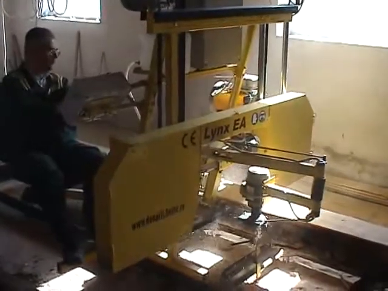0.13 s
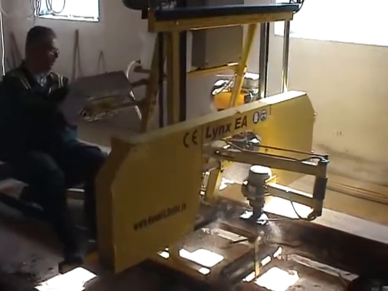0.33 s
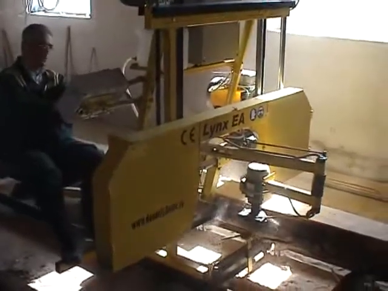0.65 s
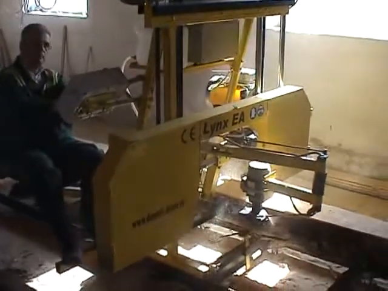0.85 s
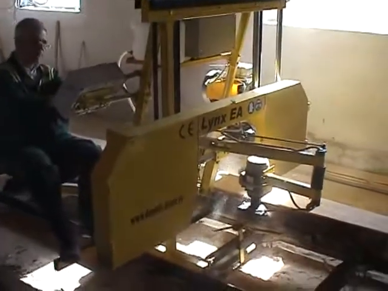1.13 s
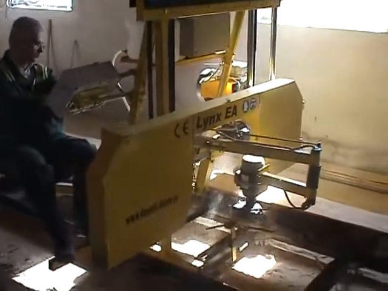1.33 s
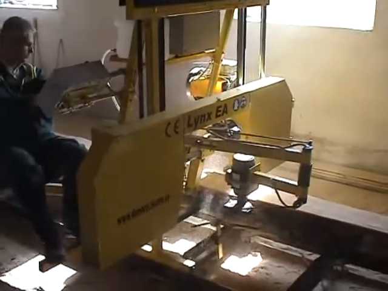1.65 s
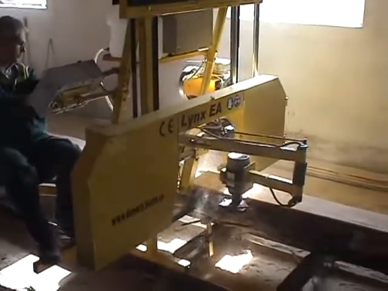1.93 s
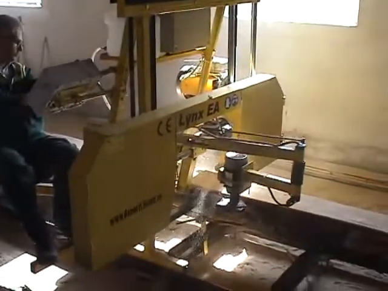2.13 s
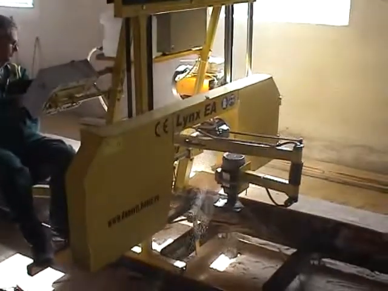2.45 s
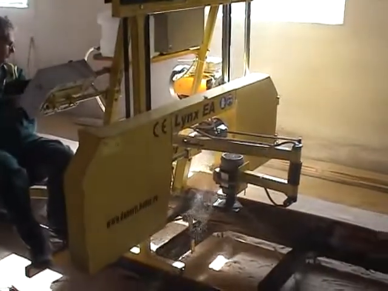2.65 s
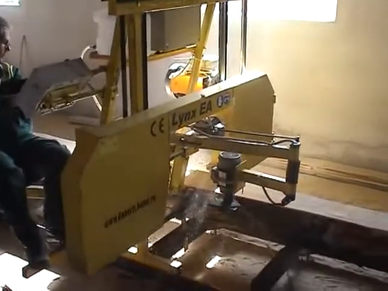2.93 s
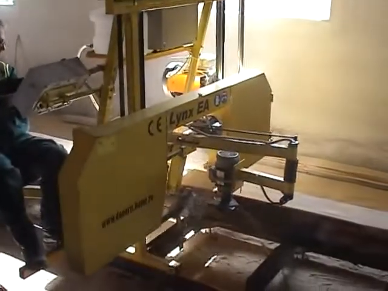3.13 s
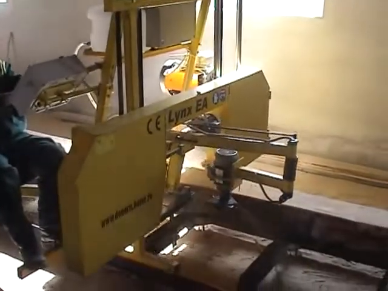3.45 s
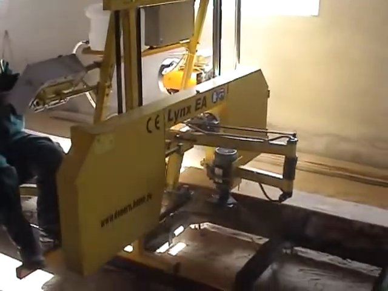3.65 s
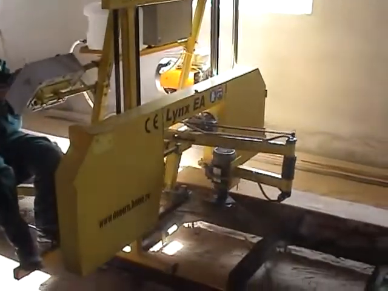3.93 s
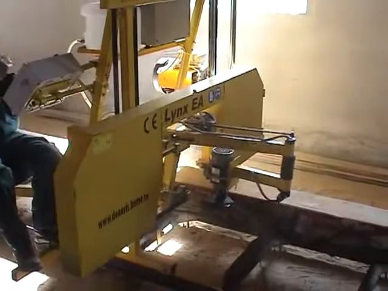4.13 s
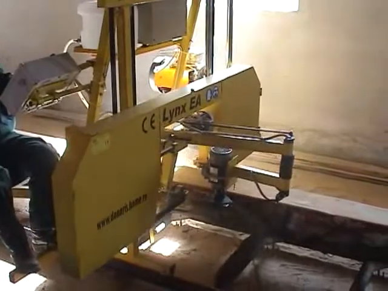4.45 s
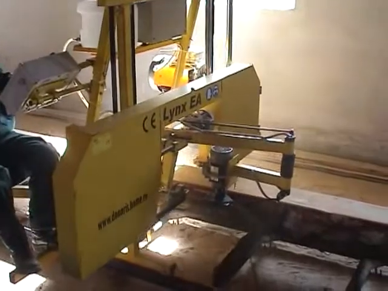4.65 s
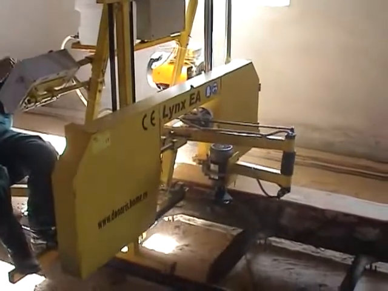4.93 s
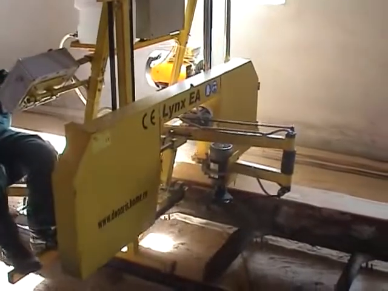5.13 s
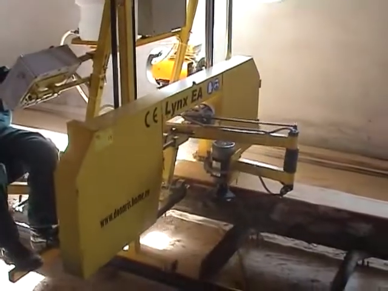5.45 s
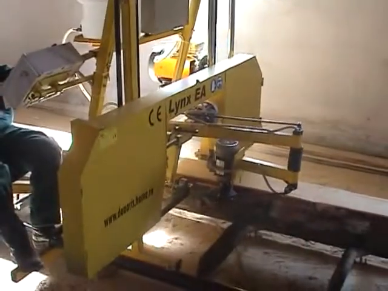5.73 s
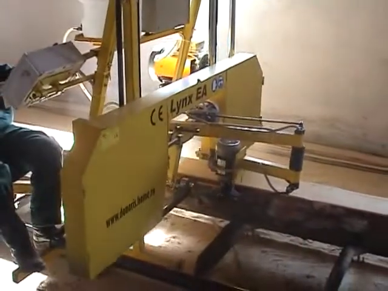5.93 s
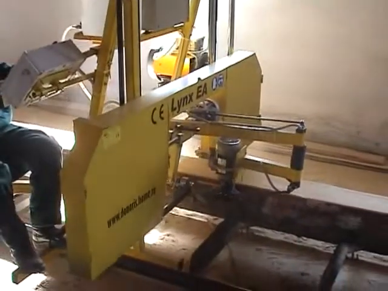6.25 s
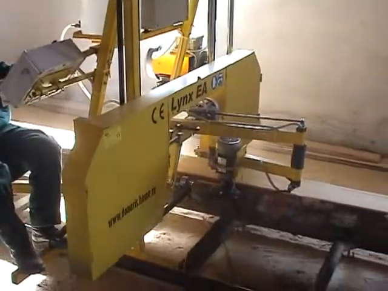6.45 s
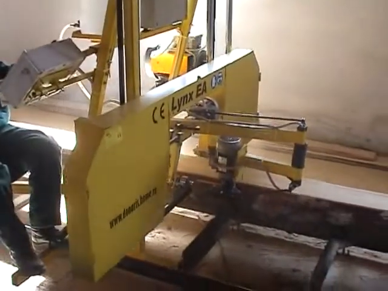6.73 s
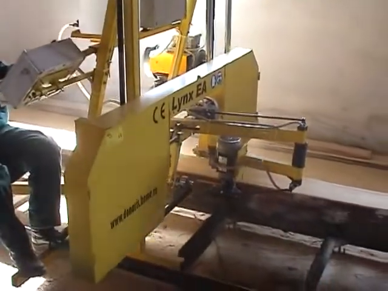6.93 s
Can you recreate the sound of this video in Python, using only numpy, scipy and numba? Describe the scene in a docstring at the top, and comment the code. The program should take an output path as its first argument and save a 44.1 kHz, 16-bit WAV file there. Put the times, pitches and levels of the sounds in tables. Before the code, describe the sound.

A band sawmill runs steadily in a bare hall, a dense loud hiss with a faint wavering metallic whine around it.

```python
"""The blade of a band sawmill hisses over wheels and wood, in a bare hall, heard in stereo.
The hiss is dense noise coloured by guard and frame panels. Two guide rollers of slightly unlike
size sing combs of thin lines, and the teeth whine as they bite, at a multiple of the roller rate.
Rollers and whine sag in pitch together when the cut loads the motor. The echoes of the hall around
the moving head make the roller lines swell and fade: slow random gains and a table of swells."""
import sys
import numpy as np
from scipy import signal
from scipy.fft import rfft, irfft, next_fast_len
from scipy.io import wavfile
from scipy.ndimage import uniform_filter1d
from numba import njit

SR = 44100
rng = np.random.default_rng(int(sys.argv[2]) if len(sys.argv) > 2 else 0)


def wav_record(signal):
    """Record a signal, one row per channel, as 16-bit PCM in the file named by sys.argv[1]."""
    frames = np.transpose(np.atleast_2d(signal))
    bounded = np.clip(frames, -1, 1)
    # unit amplitude maps onto the largest positive 16-bit level
    quanta = np.round(bounded * 32767).astype(np.int16)
    wavfile.write(sys.argv[1], SR, quanta)


N = 313109
HOP = 128   # samples between control points


def from_db(db):
    """Decibels to an amplitude factor."""
    return 10 ** (np.asarray(db) / 20)


def in_time(rows, s):
    """Columns of a table, read at the times s."""
    at, *columns = np.transpose(rows)
    return [np.interp(s, at, column) for column in columns]


def at_hz(points, hz):
    """A spectrum read on a log-frequency axis."""
    points = np.array(points, float)
    return np.interp(np.log(hz + 1), np.log(points[:, 0] + 1), points[:, 1])


def held(s, start, length, edge):
    """Rises, holds and falls, never above 1; half way through each edge at the start and the end."""
    inside = np.minimum(s - start, start + length - s)
    return np.clip(inside / edge + .5, 0, 1)


def drift(rate, shape):
    """Slow chance at the control rate, spread 1: noise through two equal low-pass poles at rate Hz."""
    pole = np.exp(-2 * np.pi * rate * HOP / SR)
    noise = rng.standard_normal((*shape, N // HOP + 510))
    slow = signal.lfilter([1], [1, -2 * pole, pole * pole], noise)[..., 500:]   # drop the settling
    return slow / slow.std()


def sides(mid, side, hz):
    """Left and right microphone signals from a shared and an unshared part, at each frequency."""
    # Each row: frequency in Hz, left-right likeness from 0 to 1.
    likeness = [(60, 0.96), (170, 0.96), (500, 0.9), (860, 0.82), (1200, 0.63), (1700, 0.82), (2300, 0.93),
                (2800, 0.97), (3300, 0.76), (5000, 0.86), (7500, 0.88), (9600, 0.94), (11000, 1),
                (15000, 1)]
    # Each row: frequency in Hz, level of left over right in dB.
    left_over_right = [(60, .3), (170, .8), (500, 1.5), (1200, 2.2), (1700, 1.6), (2700, .3), (3500, 1.8),
                       (5200, 1.1), (6500, 0), (15000, 0)]
    # Each row: frequency in Hz, phase by which left leads right in radians.
    left_lead = [(60, .05), (1200, .05), (2800, -.04), (3250, -.27), (5900, -.27), (7600, -.14), (9600, 0)]
    alike = np.clip(at_hz(likeness, hz), 0, .99)
    tilt = from_db(at_hz(left_over_right, hz) / 2) * np.exp(.5j * at_hz(left_lead, hz))
    shared = np.sqrt((1 + alike) / 2) * mid
    own = np.sqrt((1 - alike) / 2) * side
    return np.array([(shared + own) * tilt, (shared - own) / tilt])


def hiss(level_db, treble_db, rumble_db, wide_db, narrow_db, chip_db):
    """Dense rubbing noise coloured by the panels; stretches of it wax and wane as the echoes shift."""
    # Blade and sawdust hiss. Each row: frequency in Hz, relative density in dB per Hz.
    rubbing = [(15, -24), (25, -14), (480, -12), (1000, -10.5), (1300, -9), (2100, -10), (3100, -8),
               (3330, -1), (4900, -2), (5800, -0.5), (8000, -3.5), (9400, -3.5), (13000, -9.5),
               (15700, -10)]
    # Guard and frame panels. Each row: centre in Hz, width in Hz, gain at the centre in dB.
    panels = [(297, 27, 2.5), (583, 46, 4.5), (696, 32, 4.5), (850, 30, 2), (1533, 24, 4.5), (2990, 73, 3),
              (3300, 79, 3), (3870, 44, -0.5), (4140, 91, 1), (4900, 92, -1), (5630, 330, 2),
              (6900, 150, 1), (7940, 340, 4), (9200, 250, 2)]
    size = next_fast_len(N)
    hz = np.arange(size // 2 + 1) * SR / size
    colour_db = at_hz(rubbing, hz)
    for centre, width, gain_db in panels:
        colour_db = colour_db + gain_db / (1 + (2 * (hz - centre) / width) ** 2)
    mid, side = rfft(rng.standard_normal((2, size)))
    both = irfft(from_db(colour_db) * sides(mid, side, hz), size)[:, :N]

    hz, s, frames = signal.stft(both / both.std(), SR, nperseg=8 * HOP, noverlap=6 * HOP)
    steps = len(s)   # a frame comes every second control point
    wide = np.repeat(drift(6.0, (17,))[:, ::2][:, :steps], 32, axis=0)   # stretches 1.4 kHz wide
    wide = uniform_filter1d(wide, size=24, axis=0)
    narrow = np.repeat(drift(1.0, (172,))[:, ::2][:, :steps], 3, axis=0)   # stretches 130 Hz wide
    chip_load = drift(8.6, (1,))[:, ::2][:, :steps]   # flickers over all the treble
    waver_db = wide_db * wide[:len(hz)] + narrow_db * narrow[:len(hz)] + chip_db * chip_load
    waver_db = waver_db * np.clip(hz / 3000, .3, 1)[:, None]   # the low rumble wavers least

    at = np.minimum(np.arange(steps) * 2 * HOP, N - 1)[:waver_db.shape[1]]
    rumble_share = np.clip(1.5 - hz / 400, 0, 1)[:, None]   # full below 200 Hz, none above 600 Hz
    treble_share = np.clip(hz / 3000 - 2.5, 0, 1)[:, None]   # none below 7.5 kHz, full above 10.5 kHz
    lift_db = rumble_share * rumble_db[at] + treble_share * treble_db[at]
    frames = frames[..., :len(at)] * from_db(waver_db + lift_db)
    noise = signal.istft(frames, SR, nperseg=8 * HOP, noverlap=6 * HOP)[1][:, :N]
    return from_db(level_db) * noise


@njit
def comb(turns, gains, hop):
    """Multiples of a rotation, each with its own slowly changing complex gain on either side."""
    out = np.zeros((2, len(turns)))
    for n in range(len(turns)):
        i, part = n // hop, (n % hop) / hop
        step = np.exp(2j * np.pi * turns[n])
        wave = step
        for k in range(gains.shape[2]):
            for side in range(2):
                gain = (1 - part) * gains[i, side, k] + part * gains[i + 1, side, k]
                out[side, n] += (wave * gain).real
            wave *= step
    return out * np.sqrt(2)   # a gain of 1 gives a line of rms 1


def roller(which, hz, fade_rate, slip_hz, rough, count):
    """Every multiple of the turning rate sounds; echoes of the moving head fade each one at random."""
    # Roller lines in general. Each row: frequency in Hz, rms level of a line in dB before wear.
    line_levels = [(130, -56), (270, -68), (600, -56), (1000, -60), (1700, -53), (2400, -55), (3000, -51),
                   (3300, -43), (4100, -41), (5800, -41), (7000, -42), (9000, -43), (12000, -45),
                   (15500, -52)]
    # Single lines that stand out. Each row: start in seconds, length in seconds,
    # roller (0 fast, 1 slow), multiple of its turning rate, rms level in dB that the line moves to.
    swells = [(0.0, 0.68, 1, 42, -27), (0.0, 0.89, 0, 13, -41), (0.0, 1.07, 0, 30, -29),
              (0.25, 0.98, 1, 25, -31), (0.0, 0.75, 1, 12, -44), (0.7, 0.33, 1, 45, -28.5),
              (0.73, 0.41, 0, 14, -43), (0.92, 1.5, 0, 24, -32.5), (1.03, 0.31, 0, 52, -28),
              (1.1, 0.48, 1, 27, -31), (1.17, 0.6, 0, 25, -31.5), (1.21, 0.31, 1, 39, -27.5),
              (1.33, 0.4, 1, 46, -29), (1.46, 1.2, 0, 30, -30), (1.71, 0.45, 1, 26, -31),
              (1.8, 1.0, 0, 13, -42.5), (2.23, 0.64, 0, 12, -43), (1.86, 0.96, 1, 30, -29),
              (2.4, 0.56, 0, 25, -30), (2.467, 0.64, 0, 36, -30), (2.48, 0.71, 0, 30, -33),
              (2.68, 1.2, 0, 20, -40.5), (3.08, 0.57, 0, 32, -31.5), (3.12, 0.4, 0, 78, -37),
              (3.12, 1.05, 0, 27, -33), (3.38, 1.12, 0, 43, -32), (3.47, 0.99, 1, 31, -32.5),
              (3.74, 0.88, 0, 39, -31), (3.66, 0.9, 1, 12, -45), (3.93, 0.98, 1, 30, -30),
              (4.25, 0.45, 0, 14, -41), (4.12, 0.35, 0, 38, -29), (4.44, 0.46, 0, 25, -32),
              (4.61, 0.53, 1, 41, -32), (4.61, 1.1, 0, 30, -32), (4.64, 0.55, 1, 1, -51),
              (5.04, 0.2, 0, 12, -39), (5.3, 0.4, 0, 11, -44), (5.13, 0.72, 1, 42, -29.5),
              (5.13, 0.91, 1, 30, -34), (5.21, 0.43, 1, 33, -28.5), (5.24, 0.43, 1, 46, -27),
              (5.272, 1.2, 1, 29, -30), (5.29, 0.22, 1, 39, -26), (5.93, 0.58, 1, 46, -32),
              (6.07, 0.42, 0, 30, -31), (6.23, 0.41, 0, 36, -32), (6.4, 0.7, 1, 27, -33),
              (6.58, 0.34, 1, 43, -29), (6.2, 1.1, 1, 1, -48), (6.61, 0.49, 0, 16, -40.5),
              (6.68, 0.42, 1, 39, -30), (6.746, 0.34, 1, 34, -26)]
    s = np.arange(N // HOP + 10) * HOP / SR
    lines_hz = (np.arange(1, count + 1) * hz.mean())[:, None]
    a, b, c, d = drift(fade_rate, (4, count)) / np.sqrt(2)
    wear_db = 2.5 * drift(.6, (count,)) - 1   # worn running faces favour some multiples for a while
    gains = from_db(at_hz(line_levels, lines_hz) + wear_db) * sides(a + 1j * b, c + 1j * d, lines_hz)
    for start, length, who, multiple, level_db in swells:
        if round(who) == which:
            shape = held(s, start, length, edge=.12)
            k = round(multiple) - 1
            loud = from_db(level_db) * sides(1, c[k] + 1j * d[k], lines_hz[k])
            gains[:, k] += shape * (loud - gains[:, k])
    tremble, wobble = rough * drift(8.0, (2, count))   # each line breaks up in level and phase
    gains *= (1 + tremble + 1j * wobble) / np.sqrt(1 + 2 * rough ** 2)
    # the roller slips a little on the blade, which widens the high lines most
    slip = slip_hz * np.interp(np.arange(N) / SR, s, drift(5.01, (1,))[0])
    turns = np.cumsum(hz + slip) / SR
    return comb(turns, np.ascontiguousarray(gains.transpose(2, 0, 1)), HOP)


def teeth(hz, rough):
    """Biting teeth whine at their rate and its octave, which waver, flare and flutter, and at its triple."""
    # Flares of the whine. Each row: start in seconds, length in seconds,
    # multiple of the tooth rate, rms level in dB that it moves to, before the left-right tilt.
    flares = [(0.15, .22, 2, -38), (0.28, 0.19, 1, -35.5), (0.5, 0.17, 2, -37), (0.76, .12, 1, -37),
              (0.88, .17, 2, -36), (1.1, 0.11, 1, -37), (1.32, 0.19, 1, -37.5), (1.77, .1, 1, -35),
              (1.98, 0.13, 1, -38), (2.16, .12, 1, -38), (2.22, 0.11, 2, -33), (2.37, 0.32, 1, -35),
              (2.796, 0.064, 1, -37), (2.9, 0.089, 2, -47), (3.1, .15, 1, -37.5), (3.38, 0.17, 1, -39),
              (3.412, .38, 2, -36.5), (3.8, .3, 2, -41), (4.057, 0.061, 1, -38), (4.262, .2, 1, -38),
              (4.518, .1, 1, -38), (5.0, .22, 2, -40), (5.04, 0.11, 1, -39), (5.367, 0.25, 1, -29.5),
              (5.55, .27, 2, -37.5), (5.6, 0.21, 1, -36.5), (6.07, 0.14, 1, -39), (6.935, .2, 1, -35.5)]
    whine_db, octave_db, waver_db = -46, -50, 3.5   # middle levels between flares, and their spread

    def at_samples(rows):
        """Control points read at every sample."""
        return np.array([np.interp(np.arange(N) / HOP, np.arange(len(row)), row) for row in rows])

    turn = np.exp(2j * np.pi * np.cumsum(hz) / SR)
    a, b, c, d = rough * at_samples(drift(15.0, (4,)))   # uneven teeth: flutter in level and phase
    levels = from_db(np.array([[whine_db], [octave_db]]) + waver_db * at_samples(drift(5.6, (2,))))
    for start, length, multiple, level_db in flares:
        k = round(multiple) - 1
        shape = held(np.arange(N) / SR, start, length, edge=.08)
        levels[k] += shape * (from_db(level_db) - levels[k])
    # left is the louder side and leads in phase
    first = levels[0] * from_db([[1.5], [-1.5]]) * (1 + a + 1j * b) * turn * np.exp([[.3j], [-.3j]])
    octave = levels[1] * from_db([[.4], [-.4]]) * (1 + c + 1j * d) * turn ** 2
    third = from_db(-42.5) * turn ** 3   # steady
    return np.sqrt(2) * (first + octave + third).real


def scene():
    """Hiss, teeth and both rollers, all driven by the one blade."""
    # Guide rollers. Each row: time in seconds, turns per second in Hz of the fast and the slow roller.
    turn_rates = [(0.15, 137.8, 136.85), (0.45, 136.5, 135.5), (0.75, 138.0, 136.9), (1.2, 139.05, 137.85),
                  (1.65, 139.7, 138.5), (1.95, 138.0, 136.7), (2.23, 136.5, 134.7), (2.4, 137.65, 136.3),
                  (2.75, 137.55, 136.3), (3.2, 139.15, 137.65), (3.6, 138.8, 137.15), (4.45, 138.85, 137.3),
                  (4.78, 137.4, 136.1), (5.1, 138.6, 137.1), (5.42, 139.15, 137.7), (5.75, 138.2, 136.75),
                  (6.25, 139.0, 137.7), (6.65, 137.7, 136.7), (7.1, 137.95, 136.8)]
    # The cut. Each row: time in seconds, hiss level in dB before lifts and waver,
    # treble lift in dB, rumble lift in dB.
    cut = [(0, -16, 0.5, 0), (1, -16.5, 1.5, 1), (2, -16, 1, -1), (2.8, -16, 1, -1.5),
           (3.4, -16.5, 2.5, 1.5), (4.2, -16, 1.5, 0.5), (5.2, -16, 1.5, 0.5), (6.2, -16, 2.5, 2),
           (7.1, -16.5, 1.5, 2)]
    teeth_per_turn = 8.355   # teeth passing in one turn of the fast roller
    s = np.arange(N) / SR
    fast_hz, slow_hz = in_time(turn_rates, s)
    fast = roller(0, fast_hz, fade_rate=2.0, slip_hz=.08, rough=.55, count=112)
    slow = roller(1, slow_hz, fade_rate=2.0, slip_hz=.08, rough=.55, count=112)
    whine = teeth(teeth_per_turn * fast_hz, rough=.25)
    rubbing = hiss(*in_time(cut, s), wide_db=.6, narrow_db=1.5, chip_db=.33)
    return fast + slow + whine + rubbing


def record(dry):
    """Peaks are rounded a little, then a steep low-pass cuts the top."""
    rounded = 2.5 * np.tanh(dry / 2.5)
    low_pass = signal.ellip(14, .3, 80, 15740, fs=SR, output="sos")   # cutoff in Hz
    return signal.sosfilt(low_pass, rounded)


dry = scene()
out = record(dry)
wav_record(out)
```